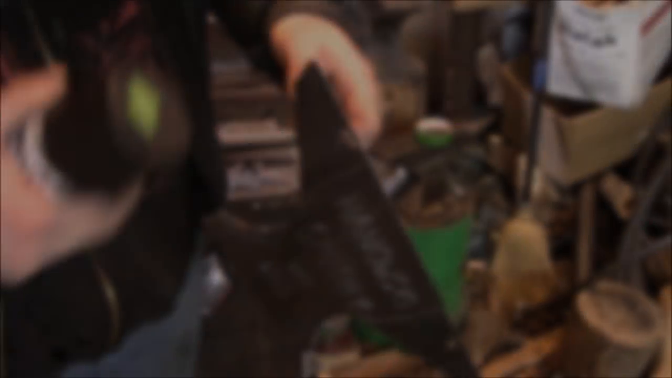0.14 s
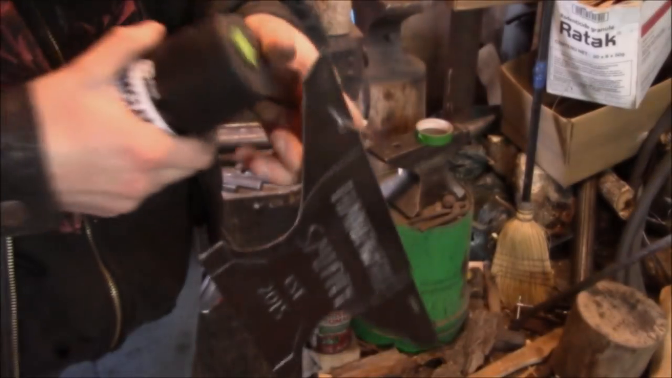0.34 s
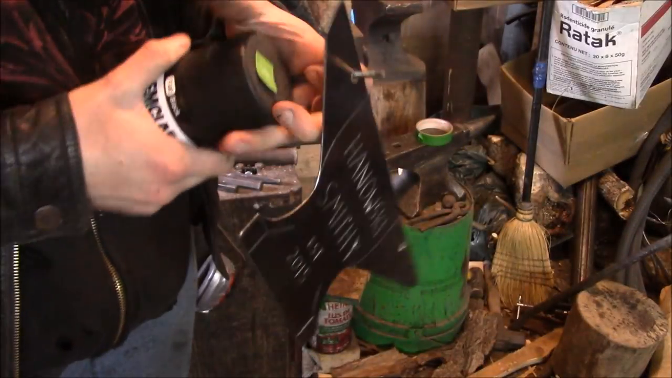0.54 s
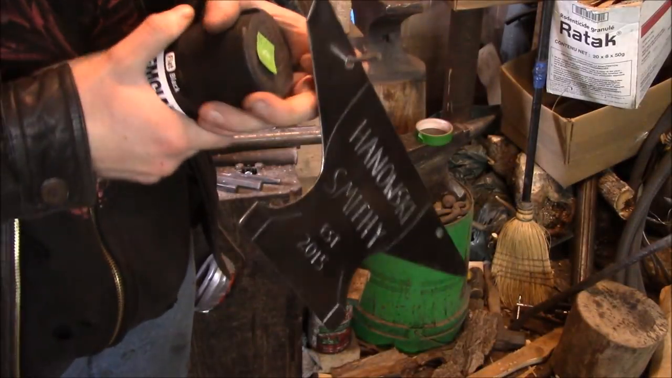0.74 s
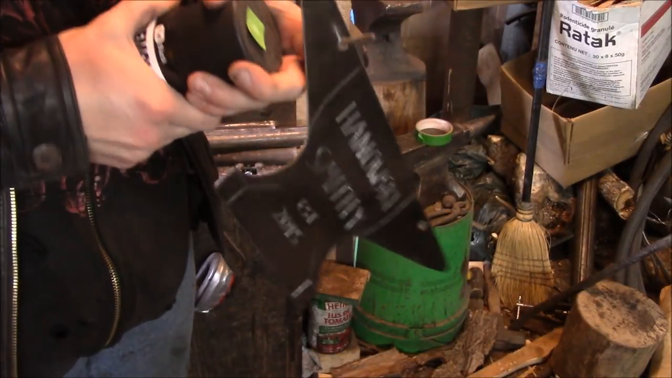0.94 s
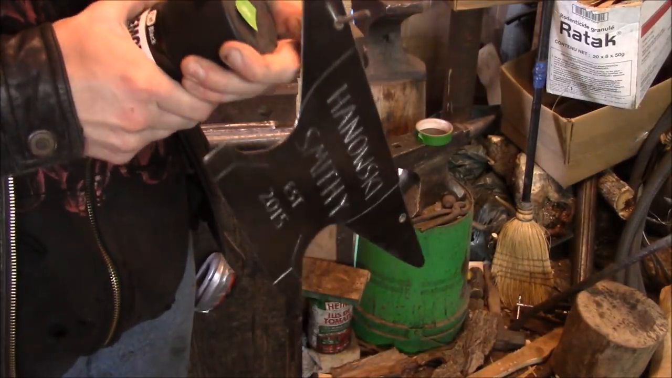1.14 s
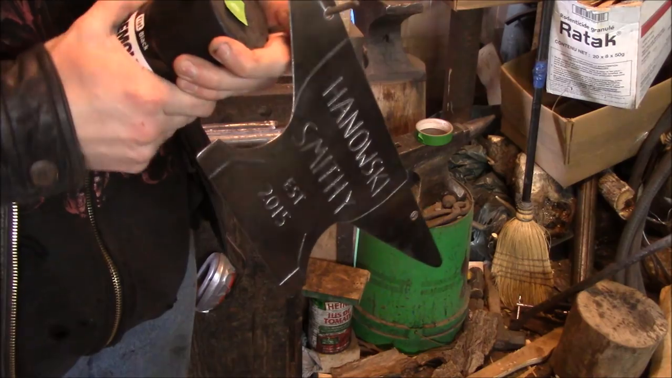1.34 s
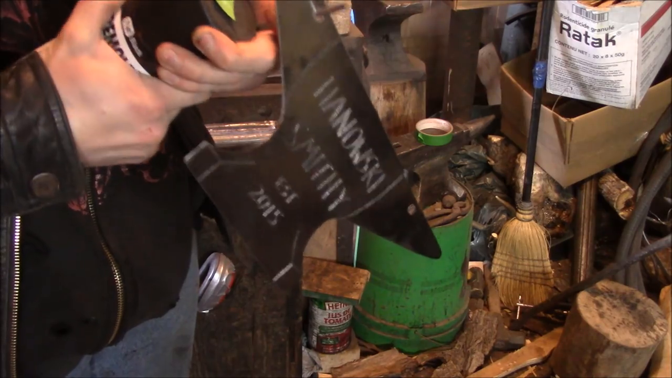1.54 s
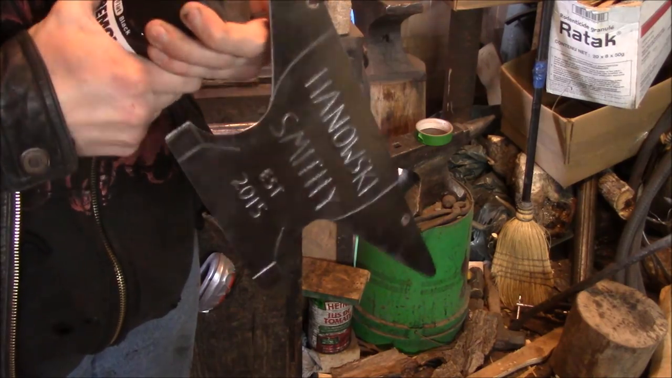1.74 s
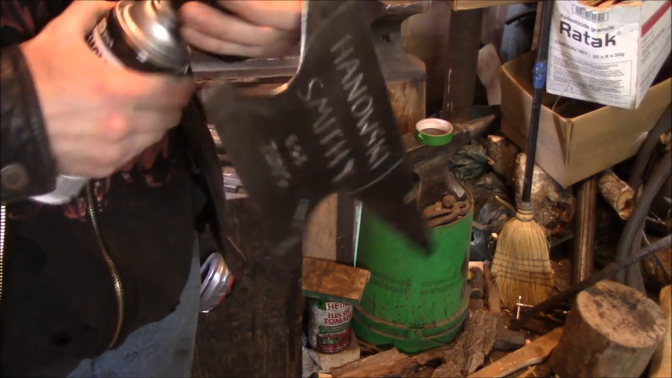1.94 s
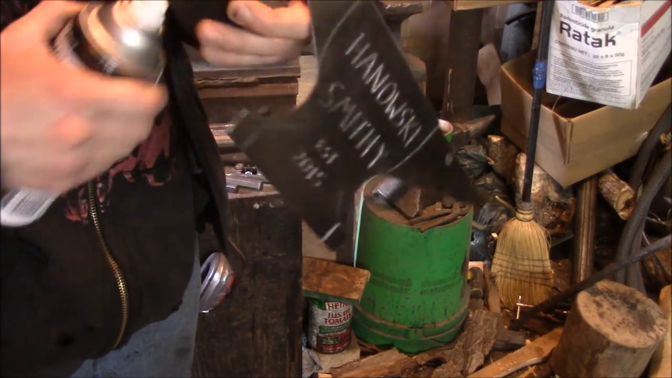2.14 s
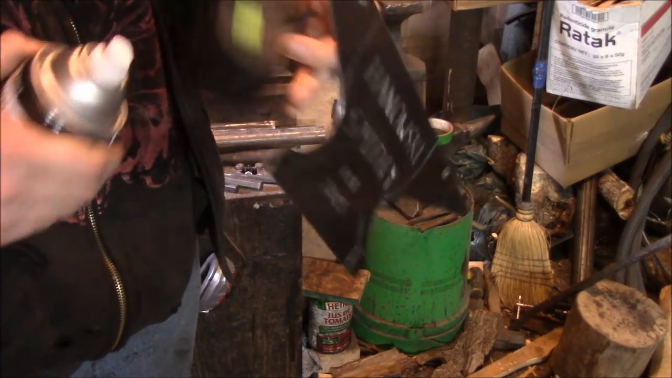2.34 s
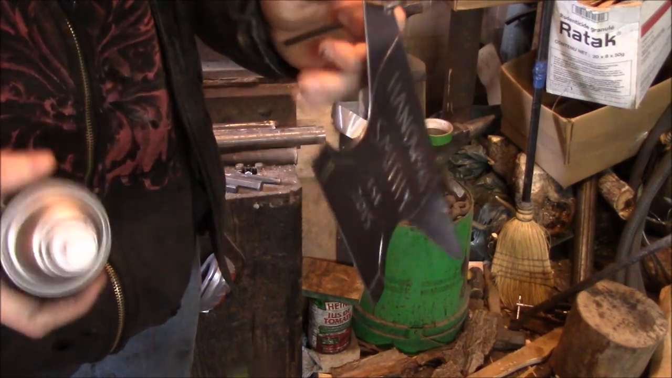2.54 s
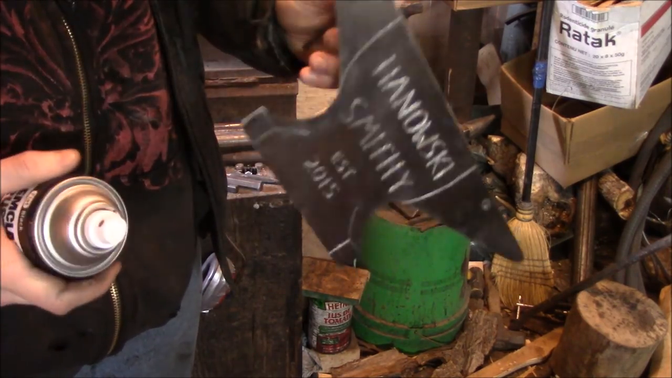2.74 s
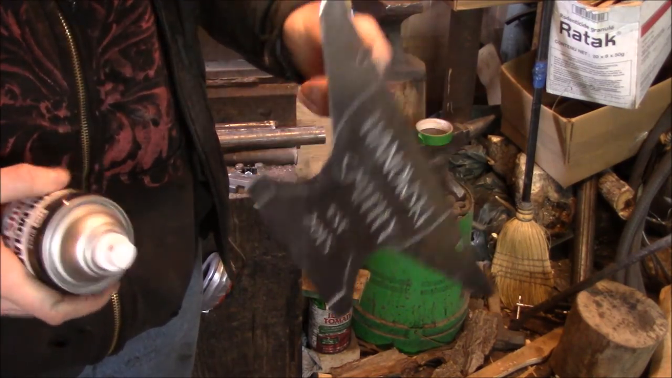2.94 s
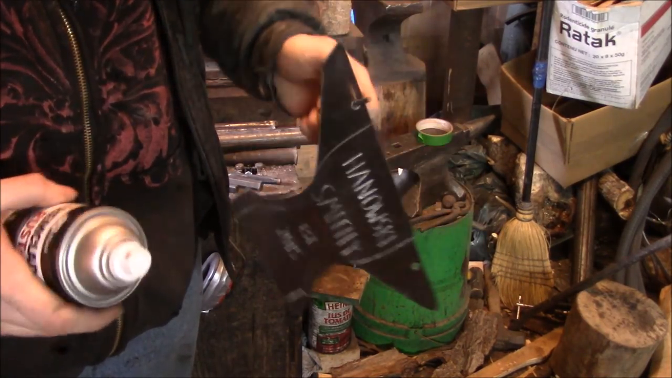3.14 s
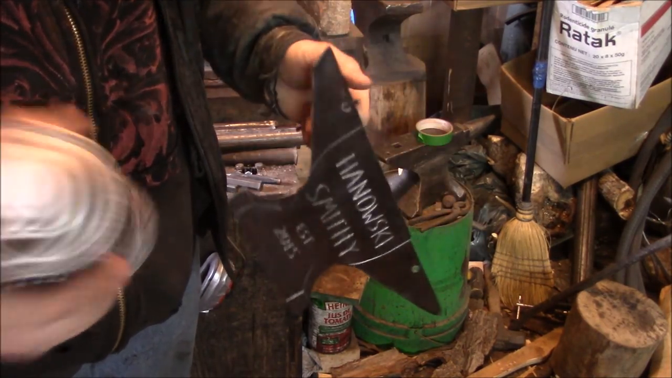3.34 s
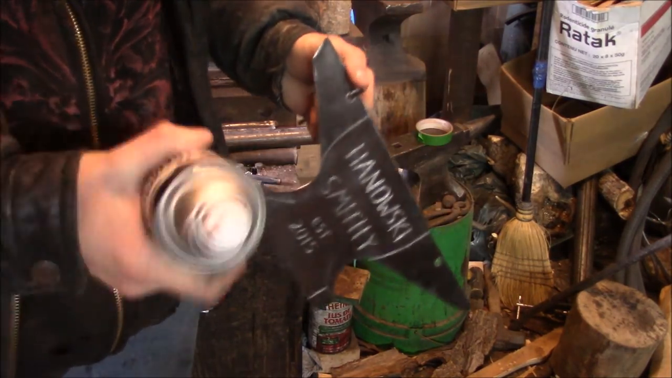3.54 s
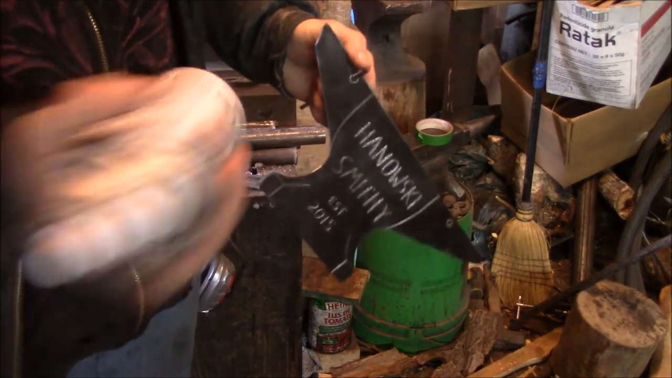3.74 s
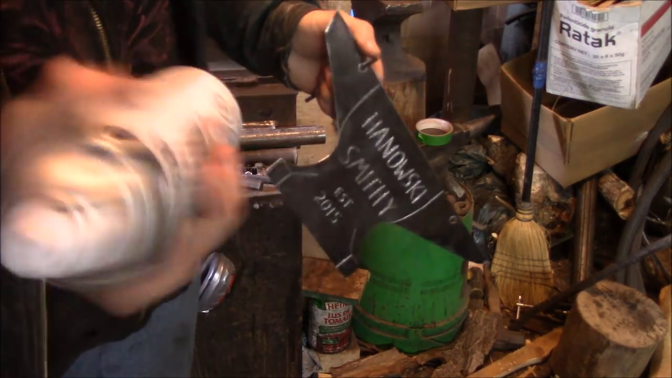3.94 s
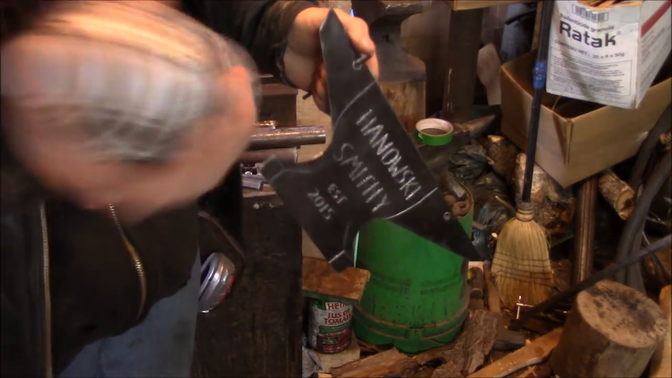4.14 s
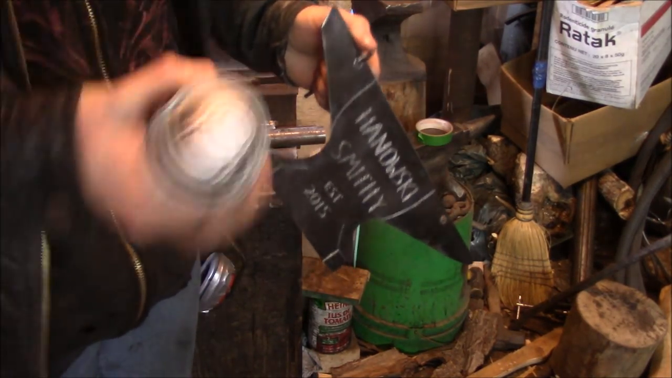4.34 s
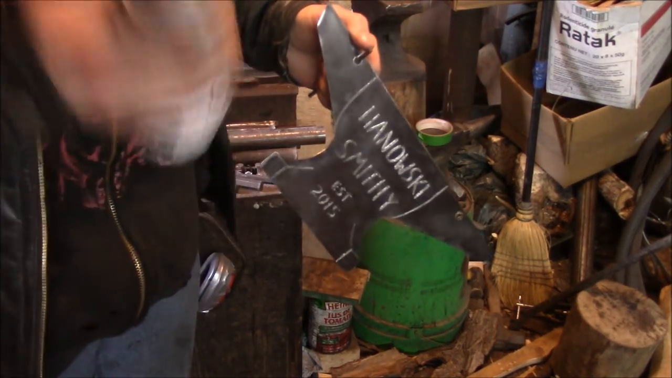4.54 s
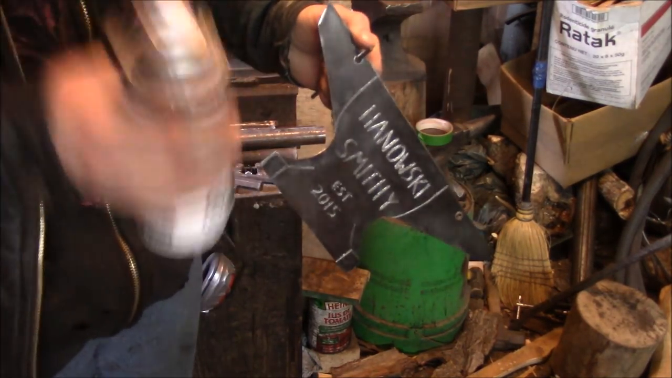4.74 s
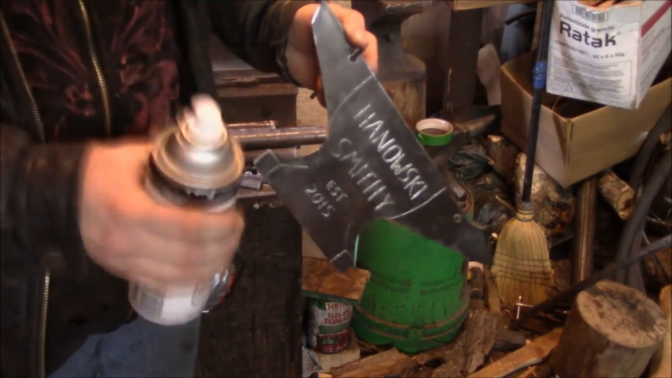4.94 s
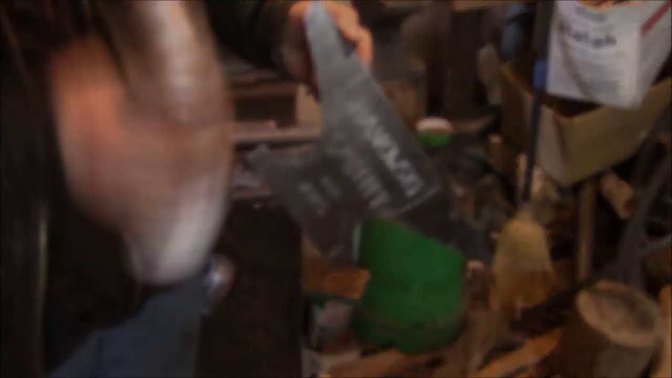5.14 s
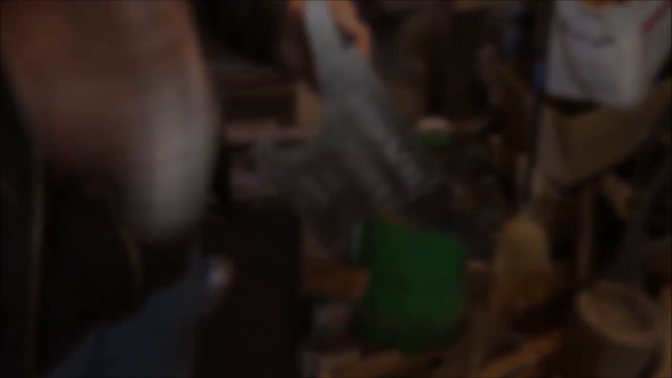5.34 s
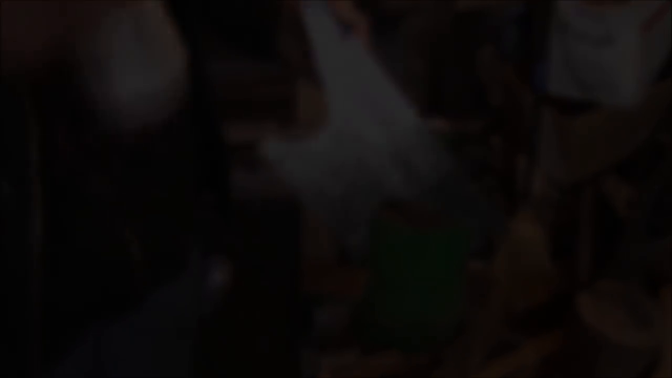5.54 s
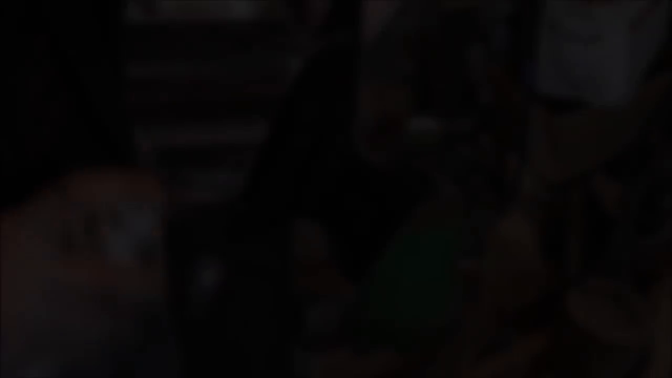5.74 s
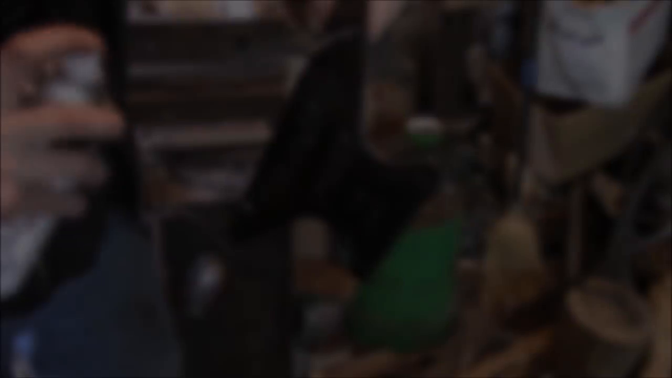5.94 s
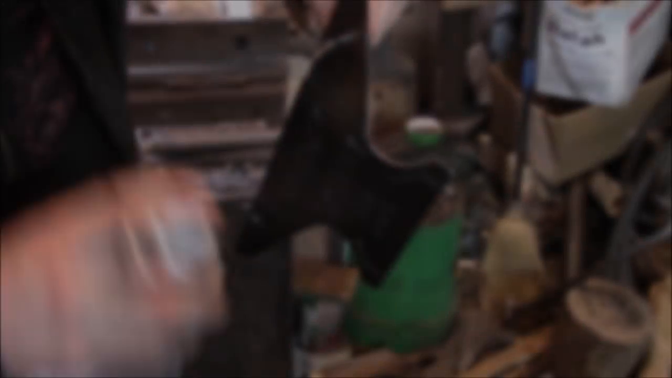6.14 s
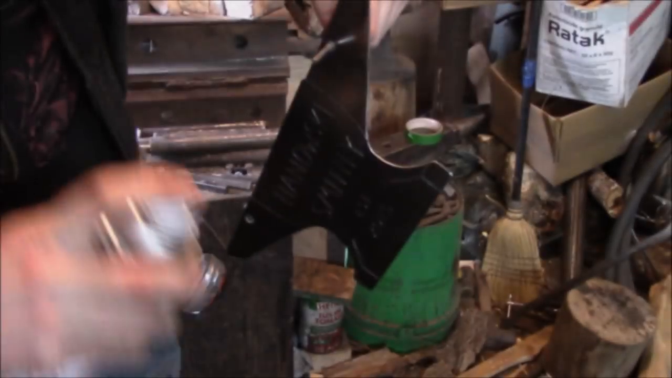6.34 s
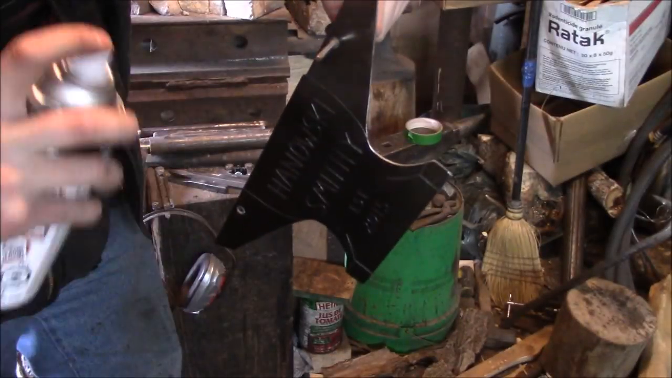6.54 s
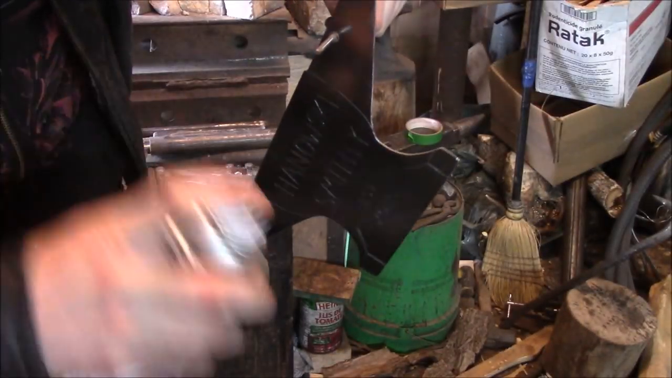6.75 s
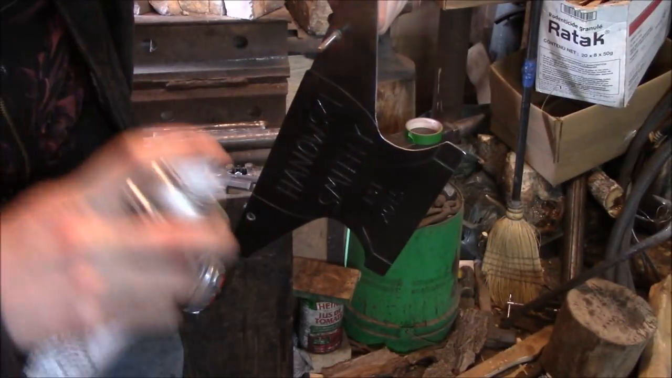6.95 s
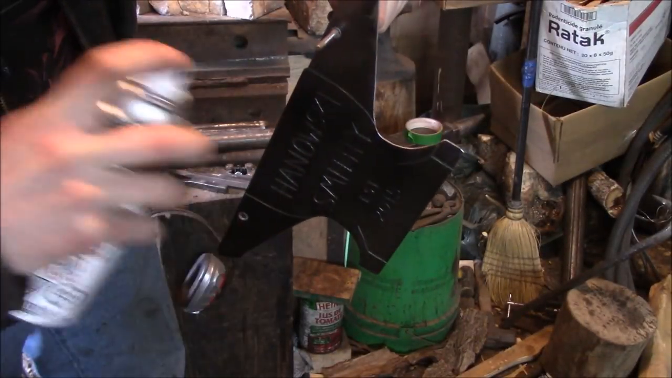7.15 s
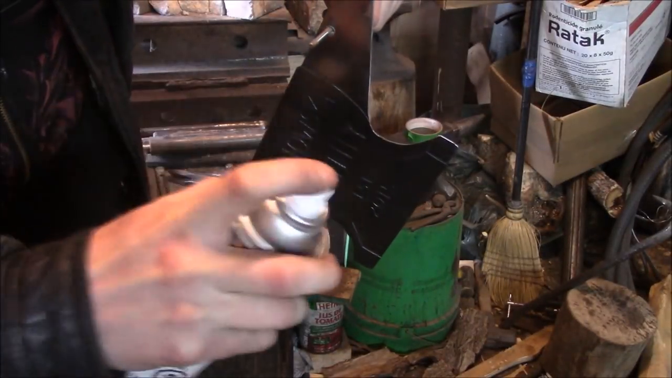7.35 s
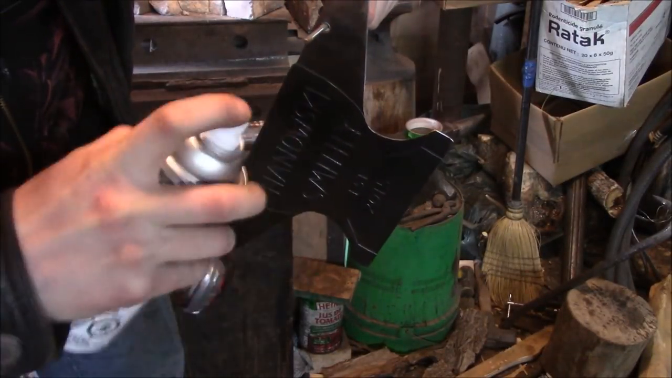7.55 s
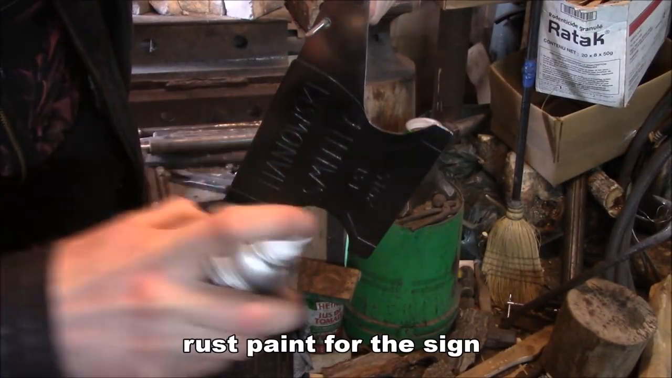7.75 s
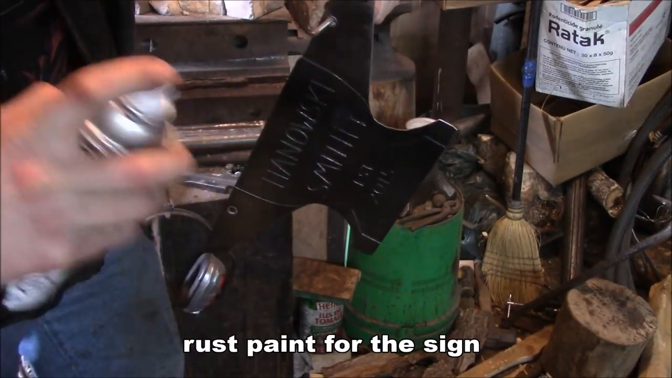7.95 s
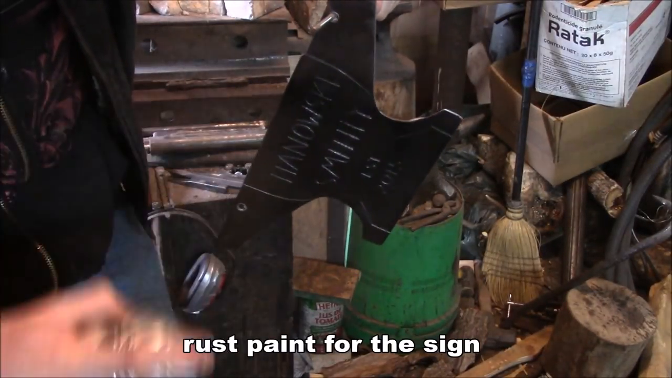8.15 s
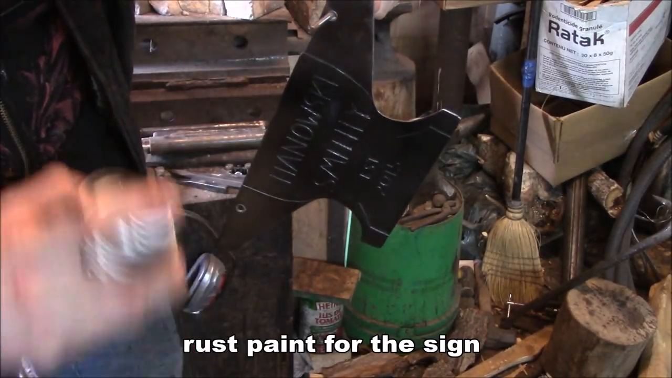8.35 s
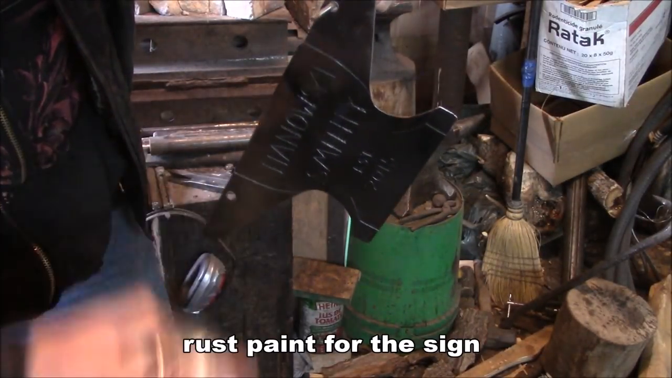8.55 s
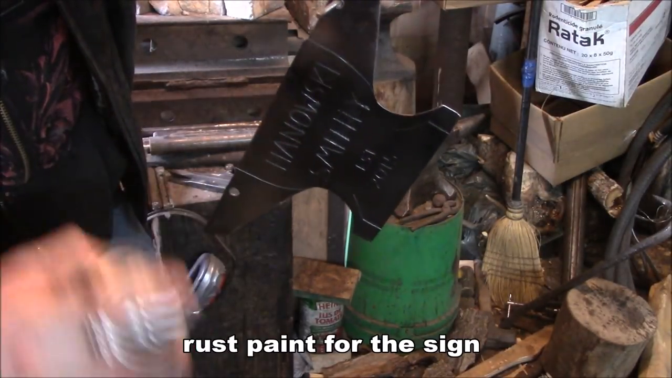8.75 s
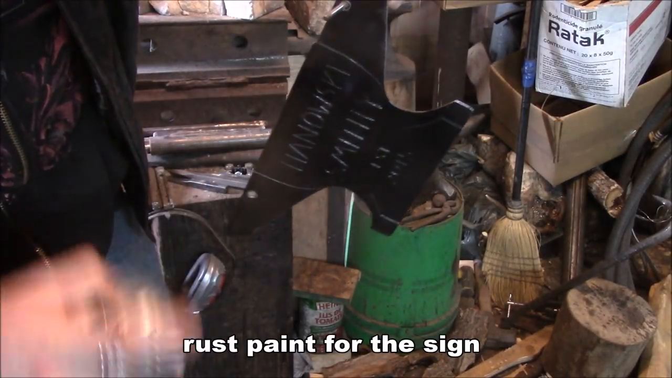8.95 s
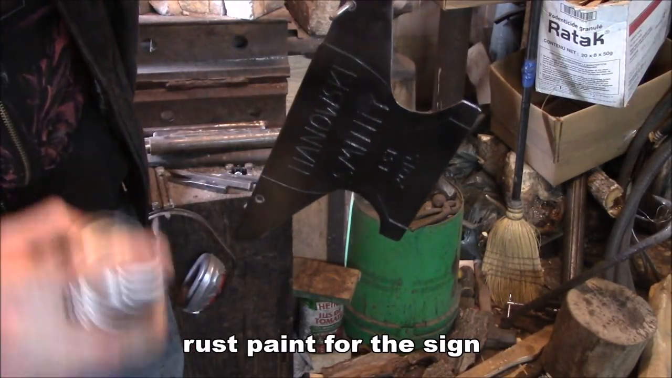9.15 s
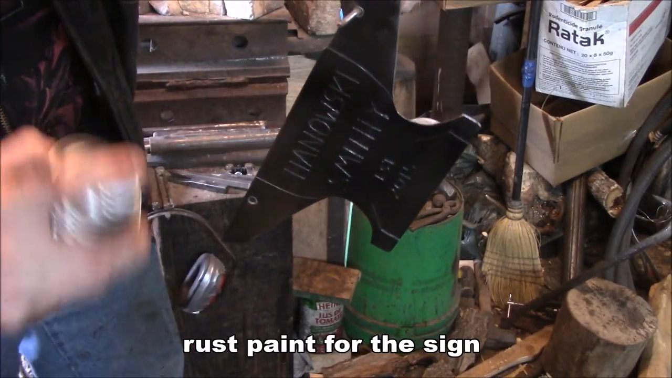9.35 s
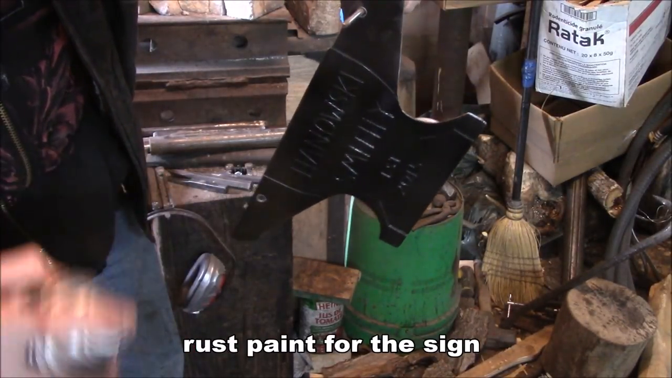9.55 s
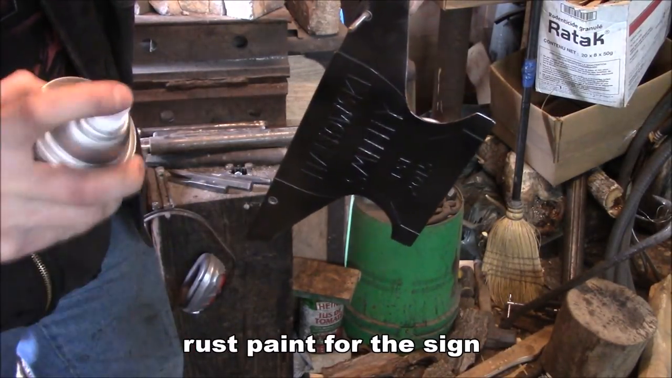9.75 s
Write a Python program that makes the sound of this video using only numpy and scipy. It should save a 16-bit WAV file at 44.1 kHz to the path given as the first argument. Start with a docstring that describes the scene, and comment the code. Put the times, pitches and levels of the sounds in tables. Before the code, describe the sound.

A close stereo view of a spray can in a small, cluttered workshop with short echoes and very faint steady air. From 0 to 0.4 seconds the plastic cap is knocked and scraped, with small clinks from a steel plate; fingers and sleeve rub softly. At 1.8 the cap snaps loose with a small hollow pop and a thin steel ring. Sharp plastic knocks follow at 2.75 and 3.1; it bounces from 3.5 and rolls with a wobble until about 5. From 3.3 to 6.5 the can is shaken, the ball clacking about ten times a second, hardest from 3.8 to 6.4, over swilling paint. Brief spray hisses come at 5.35 and 6.0. After a tiny near-silent gap at 6.5, puffs of about an eighth of a second repeat roughly every half second until 9.9, with faint ball ticks and light ringing taps on the can's wall around 8.5 to 9.2.

```python
"""A spray paint can is handled close by in a small, cluttered workshop.
Its plastic cap, a set of struck modes, is prised off beside a ringing steel sign, then drops, bounces and rolls.
Meanwhile fingers and sleeve rub, as filtered noise. The can is shaken: paint swills as noise and the mixing
ball excites short modes. Before the shaking ends, bursts of spray begin: gated noise with a nozzle whistle.
They continue to the end among a few last ticks of the ball and taps on the can's bare wall."""
import sys
import numpy as np
from scipy import signal
from scipy.fft import rfft, irfft
from scipy.io import wavfile
from scipy.ndimage import uniform_filter1d, minimum_filter1d

SR = 44100
rng = np.random.default_rng(int(sys.argv[2]) if len(sys.argv) > 2 else 0)


def dump_mix(stems):
    """Bounce the given channels to the path in sys.argv[1] as a 16-bit WAV at rate SR."""
    frames = np.atleast_2d(stems).T  # one column per channel
    limited = np.clip(frames, -1, 1)  # hard clip at full scale
    pcm = np.round(limited * 32767).astype(np.int16)
    wavfile.write(sys.argv[1], SR, pcm)


N = 432621

# ball reaches an end of the can: (time [s], dome ping [dB],
# knock against ping [dB]: low if square on, near 0 if glancing)
STROKES = [(3.3722, -30, -45), (3.653, -25, -30), (3.78, -8.5, -20), (3.8918, -26, -36),
           (3.9888, -7.5, -25.5), (4.1002, -18.5, -8.5), (4.2063, -5.5, -24), (4.2266, -16, -5.5),
           (4.3599, -28, -40), (4.4657, -21, -20.5), (4.5648, -33.5, -36), (4.6678, -33, -25),
           (4.717, -18, -11.5), (4.7941, -33.5, -36), (4.8963, -32, -23), (4.9627, -18, -3),
           (5.1152, -12.5, -14), (5.2364, -23, -7.5), (5.4552, -15.5, -8.5), (5.7098, -16.5, -13),
           (5.8184, -8, -17), (5.9227, -15, -7.5), (6.0218, -6.5, -17.5), (6.149, -14, -6.5),
           (6.2621, -11.5, -17.5), (6.2662, -5.5, -18), (6.38, -19.5, 0.5), (6.448, -35.5, -17),
           (6.803, -50.5, -22), (7.3, -52, -29), (7.746, -50.5, -34), (8.2487, -54.5, -31),
           (8.79, -43.5, -31)]
# ball glances off the paint-covered wall on its way back: (time [s], level [dB])
GLANCES = [(4.0296, -26), (4.0649, -34.5), (4.2768, -32), (4.4934, -39), (4.8339, -29), (5.0179, -28.5),
           (5.1378, -29), (5.2013, -34), (5.2935, -30), (5.5191, -28.5), (5.5643, -29.5), (5.6916, -33),
           (5.8933, -31.5), (6.0682, -24.5), (6.2319, -29), (6.33, -28), (8.5701, -38.5), (8.61, -40)]
# ball on the bare wall of the upright can: (time [s], level [dB])
WALL_TAPS = [(8.5337, -25), (8.643, -40), (8.6484, -26.5), (8.7706, -37), (8.938, -25), (9.0262, -28),
             (9.1247, -36), (9.183, -41)]
# the can is shaken: (start [s], end [s])
SHAKE = (3.3, 6.47)
# nominal modes of the can's knock, end dome, bright tick and bare wall:
# (frequency [Hz], level [dB], t60 [s])
CAN_KNOCK = [(460, -18, 0.0064), (826, -2.5, 0.014), (1010, 5.5, 0.012), (1539, 5, 0.015),
             (2106, 10, 0.0075)]
CAN_DOME = [(2695, -2, 0.0053), (3127, 4, 0.0076), (3620, -5.5, 0.0075)]
CAN_TICK = [(4700, 12.5, 0.0036), (5486, 12, 0.0071), (6950, 14, 0.0018), (8000, -0.5, 0.0045),
            (8490, 9, 0.0076), (9540, -2.5, 0.0081), (11600, -29, 0.0015)]
CAN_WALL = [(2630, 15, 0.005), (3020, 6, 0.017), (3400, 7.5, 0.0062), (4020, 7.5, 0.016),
            (4330, 6.5, 0.019), (6200, 3, 0.022), (6930, 4, 0.018), (7930, -2.5, 0.026), (8800, -7, 0.021),
            (10020, 0, 0.042), (13900, -17, .03)]

# presses of the nozzle: (down [s], up [s], relative level [dB])
PRESSES = [(5.347, 5.491, -26), (6.014, 6.142, -26.5), (6.582, 6.742, -26.5), (7.128, 7.238, -27),
           (7.535, 7.643, -27), (7.98, 8.125, -26), (8.412, 8.545, -24.5), (8.822, 8.941, -25.5),
           (9.273, 9.424, -25.5), (9.748, 9.883, -25.5)]
# jet strength through one press: (share of the press [0-1], level [dB])
PRESS_SHAPE = [(0, -19), (.15, -2), (.38, 2), (.7, -2.5), (1, -7)]
# spectrum of the jet: (frequency [Hz], level [dB])
JET_SPECTRUM = [(120, -47), (200, -25), (538, -15.5), (851, -14), (968, -12), (1530, -14.5), (2170, -8.5),
                (2650, -3), (2960, -8), (3430, -4.5), (4040, -10.5), (7410, -1), (7970, -1), (13100, -5.5),
                (16000, -18)]
# resonances of the nozzle: (frequency [Hz], width [Hz], level [dB])
NOZZLE_MODES = [(2680, 150, -5), (8230, 850, -13.5)]

# blows on the cap as it is prised off, drops and bounces:
# (time [s], nominal level [dB], rim against hollow [dB], sharpness of the contact [dB])
CAP_BLOWS = [(0.094, -40, 10, -14), (0.124, -35.5, 9, -19), (0.2946, -21, 6.5, -3.5),
             (0.3216, -31.5, -4, -4), (.3959, -15.5, 0.5, -10.5), (1.786, -22, 8, 12), (1.809, -18, 2.5, 2),
             (2.048, -34.5, -1.5, 1.5), (2.066, -32, 1, -11), (2.0882, -47.5, -1, 11),
             (2.748, -22.5, -5, 2), (2.751, -15, 1, 0), (3.1118, -28.5, -3, -0.5),
             (3.1416, -24.5, -2, -9.5), (3.2763, -30.5, -3.5, 0.5), (3.4625, -33.5, -3.5, -3),
             (3.4653, -14, -0.5, -28.5), (3.477, -21.5, -2.5, -30), (3.5171, -40.5, 4, 1),
             (3.5652, -33.5, 0.5, -5), (3.6401, -28.5, -6.5, -17), (3.6943, -42.5, 3, 11),
             (3.738, -39, -2.5, 10), (4.1541, -27.5, 1, -1), (4.171, -15.5, -0.5, -31.5),
             (4.218, -23, -2, -14), (4.2537, -30, 5.5, 6.5), (4.313, -35, 0.5, 5),
             (4.4257, -43.5, -15, -16), (4.5895, -43, -9.5, -13), (4.6504, -40.5, -5, 0),
             (4.7127, -28.5, -7, 7)]
# nominal modes of the cap's thump, hollow, rim, snap and crack: (frequency [Hz], level [dB], t60 [s])
CAP_THUMP = [(239, -12.5, 0.1), (356, 7.5, .035), (486, 12.5, 0.025), (668, 4, 0.028)]
CAP_HOLLOW = [(940, -13, .03), (1085, -4, .05), (1220, 0, .05), (1290, -5, .04)]
CAP_RIM = [(1623, 0.5, 0.03), (1820, 1, 0.034), (1950, 0, .02), (2265, 5, 0.041), (2514, 4.5, 0.031)]
CAP_SNAP = [(3080, -1.2, 0.0048), (3343, 1, 0.0036), (3624, -1.1, 0.0014), (4690, -0.5, 0.0035),
            (4806, -6, 0.0051)]
CAP_CRACK = [(6450, 7.5, 0.045), (6640, 3.5, 0.005), (8000, 20, 0.0028), (10700, 6.5, .008),
             (12040, -26.5, 0.003)]
# the cap rolls on its rim and comes to rest: (time [s], level at the swells [dB])
ROLL_LEVEL = [(3.5, -72), (3.85, -57), (4.45, -38), (4.95, -37), (5.1, -62)]
# the cap sends more into the room once out of the fist: (time [s], send against direct [dB])
CAP_ROOM_SEND = [(.1, -11), (.4, -2.5), (1.8, 2.5), (2.75, 2.5), (3.1, 5.5), (4.7, -0.5)]

# partials of the steel sign as it is bumped: (time [s], frequency [Hz], level [dB], t60 [s])
SIGN_PARTIALS = [(.1225, 4520, -11, 0.012), (.2955, 4520, -9, .014), (.2955, 1550, -19, .02),
                 (.322, 1790, -15, 0.046), (.322, 1830, -49, .25), (0.395, 1308, -41, .65),
                 (1.786, 3548, -34, 0.5), (1.786, 6200, -38, .35), (1.786, 2140, -27, 0.5),
                 (1.786, 2790, -34.5, 1.15)]

# fingers slide on the can: (middle [s], length [s], level [dB])
RUBS = [(.36, 0.24, -45), (0.551, 0.07, -41), (.68, 0.07, -52), (0.957, .1, -52), (1.248, 0.025, -56),
        (1.392, 0.13, -47.5), (2.074, 0.022, -37), (2.221, 0.028, -49), (2.326, 0.13, -55),
        (2.486, .03, -51), (2.65, 0.09, -60.5)]
# the sleeve rustles as the arm moves: (time [s], level [dB])
SLEEVE_LEVEL = [(0, -46.5), (.42, -51.5), (.72, -61), (1.65, -55.5), (2.3, -59.5), (3.2, -56.5), (6.6, -70)]
# spectra of the swilling paint, the fingers and the sleeve: (frequency [Hz], level [dB])
SLOSH_SPECTRUM = [(180, -49.5), (300, -5.5), (787, -5), (915, -9), (1250, -10), (2170, -22), (2980, -6),
                  (4090, -11.5), (8360, -19.5), (12700, -26), (16000, -60)]
RUB_SPECTRUM = [(880, -37), (1500, -7), (2060, -1.5), (2800, -3), (3310, -3), (6240, -6), (7170, -5.5),
                (8400, -2), (12000, -12.5), (16000, -27.5)]
SLEEVE_SPECTRUM = [(100, -17.5), (350, 6), (800, 2), (1400, -2.5), (2800, -1.5), (6000, -11.5),
                   (10000, -16.5), (16000, -26.5)]

# reverberation: (frequency [Hz], t60 [s], level [dB], side against mid [dB], left against right [dB])
ROOM = [(114.8, 0.26, -8.5, -6.5, 4.5), (280, 0.28, -9, -24, -2.5), (547, .22, -8, -9.5, -5),
        (1180, 0.15, -4.5, -7, 0.5), (3150, 0.23, -9.5, -14, 1), (7750, 0.2, -6, -10.5, 0),
        (14930, 0.09, -14.5, -11.5, 0)]
# all but the steady background is silent: (start [s], end [s])
PAUSE = (6.475, 6.575)
# spectra of the background, common to both channels and differing: (frequency [Hz], level [dB])
AIR_MID = [(18, -61), (30, -32.5), (131, -7.5), (227, -3), (437, -3), (486, -2.5), (760, -7.5), (937, -6.5),
           (1320, -10), (1430, -9), (1590, -11), (5740, -18.5), (16000, -29)]
AIR_SIDE = [(18, -21.5), (30, -17), (473, -3), (554, -5.5), (801, -8), (889, -7), (1250, -10.5),
            (11100, -32.5), (16000, -51)]

TICK_DB, TICK_FOLLOWS = 1, 0.65  # bright tick against the ping; share of the knock that it follows
# two soft hops: nominal wait [s], first hop for a 0 dB stroke [dB], least loss per hop [dB]
HOP_S, HOP_DB, HOP_LOSS_DB = 0.018, -22, 12.5
HOP_FOLLOWS = 0.64  # share of the stroke's level [dB] that the hops follow
GLANCE_DOME_DB, GLANCE_TICK_DB = -2, -1.5  # against the knock
CHATTER_PER_S, CHATTER_DB = 8.8, -37  # faint stray touches of the ball during the shaking
WALL_KNOCK_DB = -14  # dull knock against the ring of the wall
THUMP_DB, SNAP_DB, CRACK_DB = -12, -4, -6  # parts of a cap blow before rim and sharpness are added
THUMP_FOLLOWS, SNAP_FOLLOWS = 0.3, 0.49  # share of the contact's sharpness that goes into each
WOBBLE_PER_S, WOBBLE_DB, WOBBLE_AT_S = 4, 15.5, 4.45  # roll swells once a turn: rate, depth, time of one
POP_S = 1.787
SLOSH_DB = -48.5
AIR_MID_DB, AIR_SIDE_DB = -57.5, -63
CUTOFF_HZ = 15800


def from_db(db):
    """Logarithmic levels: decibels to amplitude gain."""
    return 10 ** (np.asarray(db) / 20)


def rms_one(x):
    """Power normalisation: scale to an rms of 1."""
    return x / np.sqrt(np.mean(x ** 2) + 1e-20)


def unit_blow(x):
    """Energy normalisation: scale to the energy of 10 ms at an rms of 1."""
    return x * np.sqrt(SR / 100 / (np.sum(x ** 2) + 1e-20))


def seconds(count):
    """Sampling: time axis of so many samples."""
    return np.arange(count) / SR


def level_curve(rows):
    """Amplitude envelope: levels interpolated in decibels through time."""
    return from_db(np.interp(seconds(N), *np.transpose(rows)))


def at_hz(rows, hz):
    """Logarithmic frequency scale: the columns of a table interpolated along it."""
    known, *columns = np.transpose(rows)
    return [np.interp(np.log(hz + 1e-9), np.log(known), c) for c in columns]


def coloured(x, spectrum):
    """Spectral shaping: weight a steady signal in frequency; rms 1."""
    hz = np.arange(N // 2 + 1) * SR / N
    gain = from_db(at_hz(spectrum, hz)[0])
    return rms_one(irfft(rfft(x) * gain, N))


def band(x, low, high):
    """Band limitation by a Butterworth band-pass."""
    coefficients = signal.butter(2, [low, min(high, SR / 2 - 500)], "band", fs=SR)
    return signal.lfilter(*coefficients, x)


def add(track, s, sound):
    """Superposition: mix a sound into a track at a time."""
    at = max(round(s * SR), 0)
    track[at:at + len(sound)] += sound[:max(N - at, 0)]


def grains(per_s, spread_db):
    """Shot noise: random tiny impacts of uneven size; rms 1."""
    sizes = from_db(spread_db * np.minimum(rng.exponential(1, N), 4)) * rng.choice([-1, 1], N)
    return rms_one(sizes * (rng.random(N) < per_s / SR))


def hump(middle, length):
    """Gaussian envelope: a smooth swell and fade of height 1."""
    return np.exp(-np.minimum((2 * (seconds(N) - middle) / length) ** 2, 50))


def partial(hz, db, t60):
    """Damped oscillation: a single decaying resonance."""
    t = seconds(count=60000)
    return from_db(db - 60 * t / t60) * np.sin(2 * np.pi * hz * t)


def strike(modes, detune, grit_db, grit_t60):
    """Modal excitation: strength and pitch vary with the spot hit, over a wash of dense short modes."""
    t = seconds(count=2600)
    hz, db, t60 = np.transpose(modes)[:, :, None]
    spot, shift = rng.standard_normal((2, len(hz), 1))
    sign = (-1) ** np.arange(len(hz))[:, None]
    decay = from_db(db + 1.66 * spot - 60 * t / t60)
    modal = (sign * decay * np.sin(2 * np.pi * hz * (1 + detune * shift) * t)).sum(0)
    noise = rng.standard_normal(len(t)) * from_db(-60 * t / grit_t60)
    grit = band(noise, hz.min() * 0.65, hz.max() * 1.144)
    blow = unit_blow(modal) + from_db(grit_db) * unit_blow(grit)
    # a small part radiates little below its lowest mode
    high_pass = signal.butter(2, hz.min() * 0.82, "high", fs=SR)
    return unit_blow(signal.lfilter(*high_pass, blow))


def shaking(fade_s=0.052):
    """Gating: 1 while the can is shaken, else 0, with linear fades."""
    t = seconds(N)
    return np.clip(np.minimum(t - SHAKE[0], SHAKE[1] - t) / fade_s, 0, 1)


def end_blow(knock_db, dome_db, tick_db):
    """Damping: paint stops the can's ends within milliseconds and shifts their pitch from blow to blow."""
    return (from_db(knock_db) * strike(CAN_KNOCK, detune=0.17, grit_db=-7.0, grit_t60=0.014)
            + from_db(dome_db) * strike(CAN_DOME, detune=0.036, grit_db=-3.5, grit_t60=0.009)
            + from_db(tick_db) * strike(CAN_TICK, detune=0.083, grit_db=-2.5, grit_t60=0.0053))


def glance(db):
    """Oblique impact: mostly dull knock, with some ping and tick."""
    return from_db(db) * end_blow(0, GLANCE_DOME_DB, GLANCE_TICK_DB)


def ball(chatter_spread_db=3):
    """Impact excitation: the ball hits an end, hops, and glances off the wall; the bare wall rings longer."""
    out = np.zeros(N)
    waits = rng.uniform(0.76, 1.1, len(STROKES))
    for (s, db, knock_db), wait in zip(STROKES, waits):
        tick_db = TICK_DB + TICK_FOLLOWS * knock_db
        add(out, s, from_db(db) * end_blow(knock_db, 0, tick_db))
        # the hops are soft, so they only ping
        hop_db = min(HOP_DB + HOP_FOLLOWS * db, db - HOP_LOSS_DB)
        for k in range(2):
            ping = strike(CAN_DOME, detune=0.034, grit_db=-7.5, grit_t60=0.008)
            add(out, s + (k + 1) * wait * HOP_S, from_db(hop_db - k * HOP_LOSS_DB) * ping)
    for s, db in GLANCES:
        add(out, s, glance(db))
    for s, db in WALL_TAPS:
        knock = strike(CAN_KNOCK, detune=0.21, grit_db=-4.0, grit_t60=0.013)
        wall = strike(CAN_WALL, detune=0.0142, grit_db=-15.0, grit_t60=0.013)
        add(out, s, from_db(db + WALL_KNOCK_DB) * knock)
        add(out, s, from_db(db) * wall)
    sizes = from_db(chatter_spread_db * rng.standard_normal(N))
    touches = (rng.random(N) < CHATTER_PER_S / SR) * sizes
    soft_touch = from_db(CHATTER_DB) * end_blow(knock_db=-2, dome_db=0, tick_db=-10)
    return out + signal.oaconvolve(shaking() * touches, soft_touch)[:N]


def spray(valve_s=0.0043, sputter_db=1.5, whistle_db=-7, whistle_fade_db=10):
    """Jet noise: it swells as the valve opens, sags as the finger eases off; the nozzle's whistle fades."""
    t = seconds(N)
    flow, whistle = np.zeros((2, N))
    for down, up, db in PRESSES:
        opening = np.clip(np.minimum(t - down, up + valve_s - t) / valve_s, 0, 1)
        progress = (t - down) / (up - down)
        jet_db = np.interp(progress, *np.transpose(PRESS_SHAPE))
        flow += opening * from_db(db + jet_db)
        whistle += opening * from_db(db + 0.28 * jet_db - whistle_fade_db * np.clip(progress, 0, 1))
    hiss = coloured(rng.standard_normal(N) + 0.603 * grains(per_s=5000, spread_db=4), JET_SPECTRUM)
    tone = np.zeros(N)
    for hz, width, db in NOZZLE_MODES:
        resonance = signal.iirpeak(hz, hz / width, fs=SR)
        tone += from_db(db) * rms_one(signal.lfilter(*resonance, rng.standard_normal(N)))
    sputter = from_db(sputter_db * rms_one(band(rng.standard_normal(N), 30.1, 440)))
    return sputter * (from_db(-2) * flow * hiss + from_db(whistle_db) * whistle * tone)


def off_the_sign(x, near_s=0.000259, far_s=0.00111, bounce=0.054):
    """Comb filtering: the jet also arrives by way of the plate; the detour changes as the hand sweeps."""
    t = seconds(N)
    sweep = 0.5 + 0.5 * np.sin(2 * np.pi * 1.15 * t)
    detour = near_s + (far_s - near_s) * sweep
    return (x + bounce * np.interp(t - detour, t, x)) / np.sqrt(1 + bounce ** 2)


def cap():
    """Shell vibration: blows and rolling excite the hollow cap; returns direct sound and room send."""
    direct, send = np.zeros((2, N))
    for s, db, rim_db, sharp_db in CAP_BLOWS:
        thump_db = THUMP_DB + THUMP_FOLLOWS * sharp_db
        snap_db = SNAP_DB + rim_db + SNAP_FOLLOWS * sharp_db
        blow = from_db(db) * (
            from_db(thump_db) * strike(CAP_THUMP, detune=0.027, grit_db=2.5, grit_t60=0.046)
            + from_db(-rim_db) * strike(CAP_HOLLOW, detune=0.025, grit_db=2, grit_t60=0.026)
            + from_db(rim_db) * strike(CAP_RIM, detune=0.033, grit_db=5, grit_t60=0.008)
            + from_db(snap_db) * strike(CAP_SNAP, detune=0.035, grit_db=-2, grit_t60=0.053)
            + from_db(CRACK_DB + sharp_db) * strike(CAP_CRACK, detune=0.029, grit_db=-0.5, grit_t60=0.013))
        add(direct, s, blow)
        add(send, s, from_db(np.interp(s, *np.transpose(CAP_ROOM_SEND))) * blow)
    # rolling is a stream of tiny blows on the same hollow shell
    shell = strike(CAP_HOLLOW, detune=0.024, grit_db=5.5, grit_t60=0.018)
    rumble = rms_one(signal.fftconvolve(grains(per_s=130, spread_db=3.5), shell)[:N])
    turn = np.abs(np.sin(np.pi * WOBBLE_PER_S * (seconds(N) - WOBBLE_AT_S)))
    roll = level_curve(ROLL_LEVEL) * from_db(-WOBBLE_DB * turn) * rumble
    return direct + roll, send + roll


def rings(pop_hz=310, pop_db=-13, pop_t60=0.019):
    """Free vibration: air under the cap pops as it lets go; the steel plate rings with thin partials."""
    out = np.zeros(N)
    add(out, POP_S, band(partial(pop_hz, pop_db, pop_t60), 200, 900))
    for s, hz, db, t60 in SIGN_PARTIALS:
        add(out, s, partial(hz, db, t60))
    return out


def handling():
    """Friction and flow noise: paint swills inside the can; fingers slide on it and the sleeve rustles."""
    slosh = coloured(grains(per_s=2600, spread_db=9.0) + 1.8 * rng.standard_normal(N), SLOSH_SPECTRUM)
    rub = coloured(grains(per_s=4800, spread_db=3.5), RUB_SPECTRUM)
    sleeve = coloured(grains(per_s=2100, spread_db=2.0), SLEEVE_SPECTRUM)
    slide = sum(from_db(db) * hump(s, length) for s, length, db in RUBS)
    return from_db(SLOSH_DB) * shaking() * slosh + slide * rub + level_curve(SLEEVE_LEVEL) * sleeve


def microphone(x, hollow_hz=270, left_dip=0.79, right_lift=0.54):
    """Interchannel level difference: low mids come in stronger on the right capsule."""
    low_mids = signal.lfilter(*signal.iirpeak(hollow_hz, 0.6, fs=SR), x)
    return x + np.array([[-left_dip], [right_lift]]) * low_mids


def echoes(first_echo_s=0.0036, hold_s=0.0034):
    """Diffuse reverberation of the clutter: dense echoes hold briefly, then die away band by band."""
    t = seconds(count=13000)
    late = np.maximum(t - first_echo_s - hold_s, 0)
    edges = np.geomspace(60, 17000, num=13)
    response = 0
    left_right = np.array([[1], [-1]])
    for low, high in zip(edges, edges[1:]):
        t60, db, side_db, pan_db = at_hz(ROOM, np.sqrt(low * high))
        fade = (t > first_echo_s) * from_db(-60 * late / t60)
        noise = rng.standard_normal((2, len(t))) * fade / np.sqrt(np.sum(fade ** 2))
        mid, side = band(noise, low, high)
        stereo = mid + left_right * from_db(side_db) * side
        response = response + from_db(db + left_right * pan_db / 2) * stereo
    return response


def workshop(x, count=4):
    """Position-dependent room response: the moving source passes from one echo pattern to the next."""
    spot = 4.3 * seconds(N)  # patterns passed, taken in a cycle
    out = 0
    for k in range(count):
        distance = np.abs((spot - k + count / 2) % count - count / 2)
        share = np.sqrt(np.maximum(1 - distance, 0))  # equal-power crossfade
        out = out + signal.oaconvolve((share * x)[None], echoes(), axes=1)[:, :N]
    return out


def air():
    """Stationary noise: the faint steady background of the workshop, as mid and side."""
    mid = from_db(AIR_MID_DB) * coloured(rng.standard_normal(N), AIR_MID)
    side = from_db(AIR_SIDE_DB) * coloured(rng.standard_normal(N), AIR_SIDE)
    return np.array([mid + side, mid - side])


def scene(can_pan_db=1.43):
    """Superposition of direct and reverberant sound; the can is close and a little to the left."""
    cap_direct, cap_send = cap()
    can = ball() + off_the_sign(spray()) + handling()
    can_pan = from_db(np.array([[1], [-1]]) * can_pan_db / 2)
    near = can * can_pan + cap_direct + rings()
    t = seconds(N)
    going = uniform_filter1d(1.0 * ((t < PAUSE[0]) | (t > PAUSE[1])), size=100)
    return going * microphone(near + workshop(can + cap_send)) + air()


def record(dry, limit=1.28, ceiling=0.81):
    """Dynamic limiting: a fast limiter holds the hardest blows, soft clipping follows, the top is cut."""
    allowed = np.minimum(1, limit / (np.abs(dry).max(0) + 1e-9))
    held = dry * uniform_filter1d(minimum_filter1d(allowed, size=31), size=21)
    clipped = held / (1 + (held / ceiling) ** 6) ** (1 / 6)
    low_pass = signal.ellip(10, 0.2, 80, CUTOFF_HZ, fs=SR, output="sos")
    return signal.sosfilt(low_pass, clipped)


dry = scene()
out = record(dry)
dump_mix(out)
```